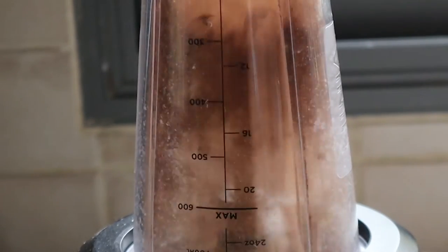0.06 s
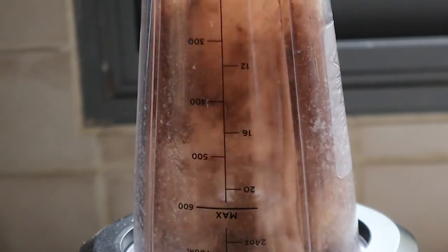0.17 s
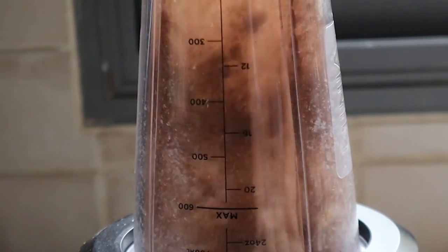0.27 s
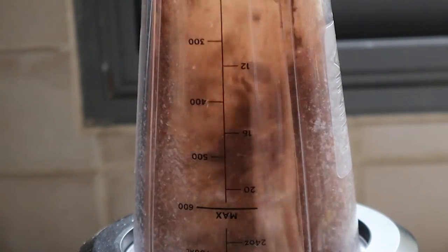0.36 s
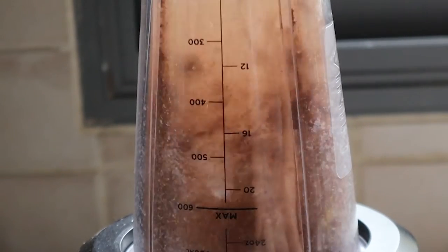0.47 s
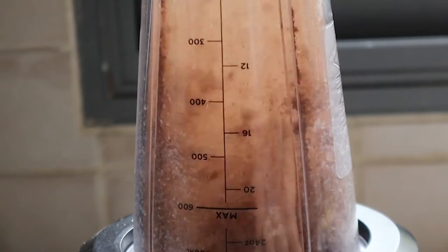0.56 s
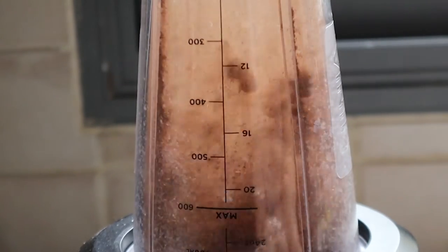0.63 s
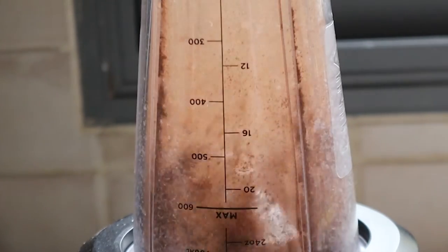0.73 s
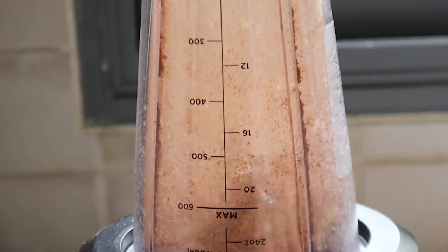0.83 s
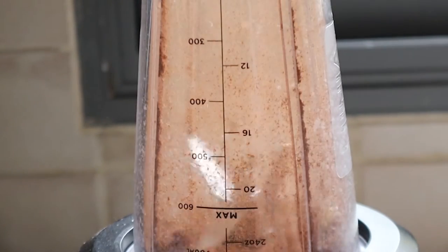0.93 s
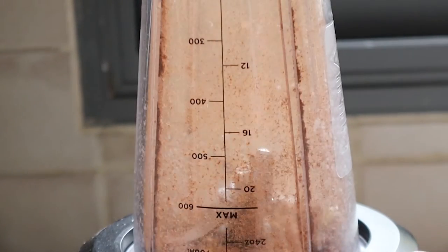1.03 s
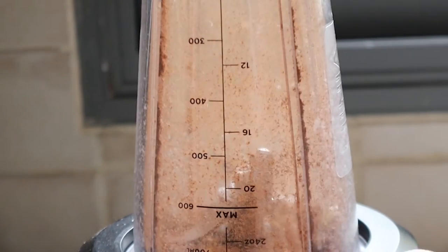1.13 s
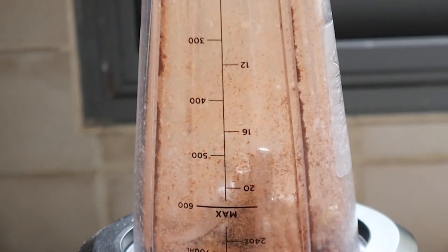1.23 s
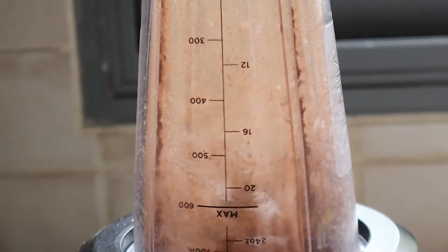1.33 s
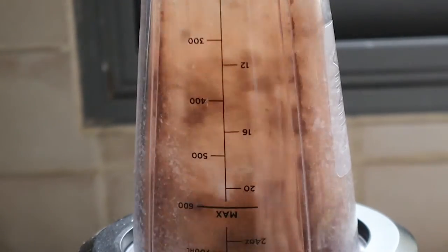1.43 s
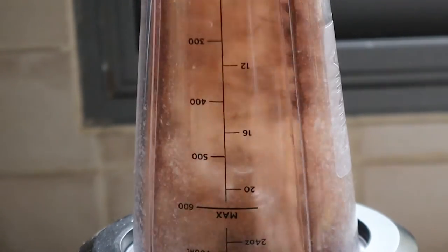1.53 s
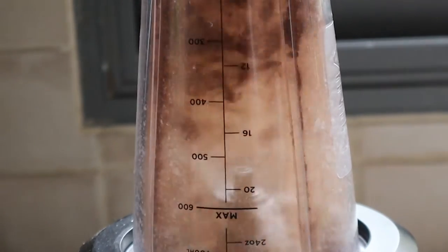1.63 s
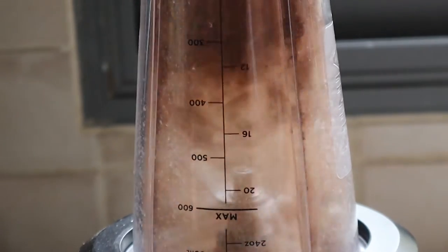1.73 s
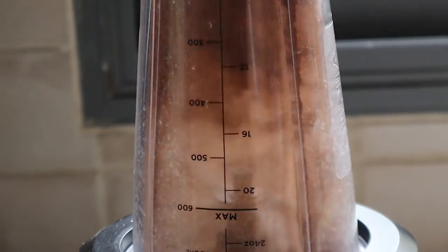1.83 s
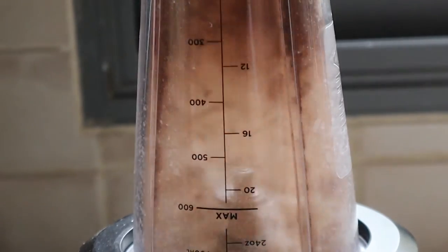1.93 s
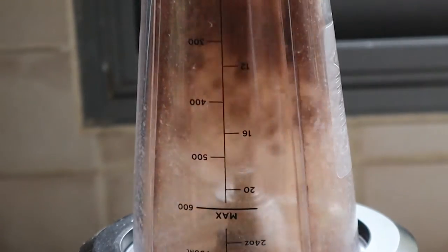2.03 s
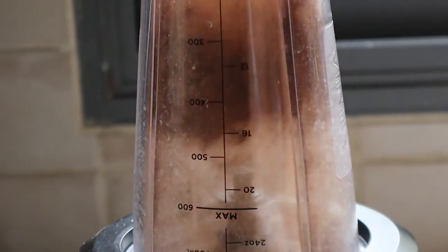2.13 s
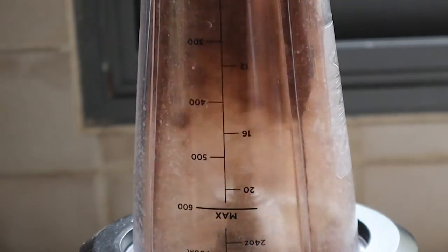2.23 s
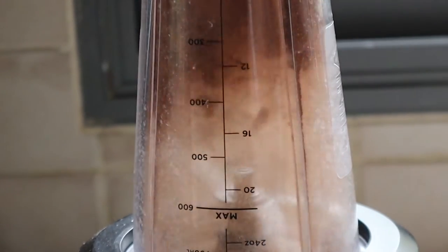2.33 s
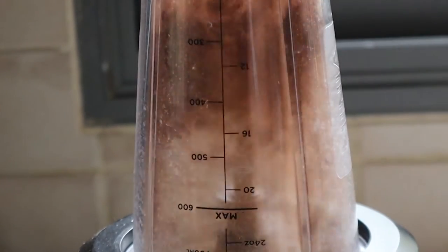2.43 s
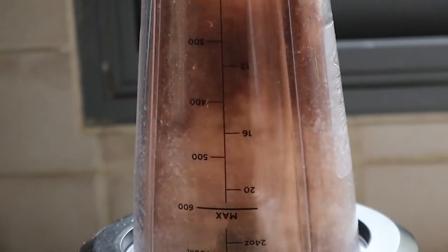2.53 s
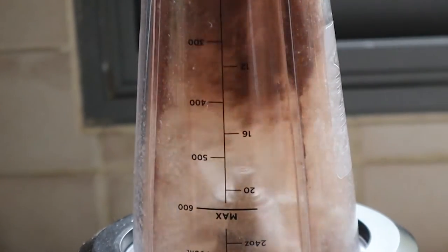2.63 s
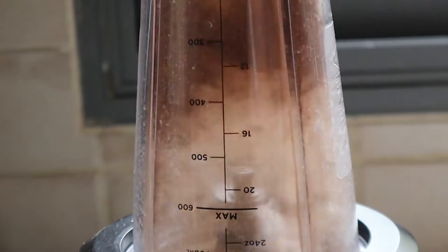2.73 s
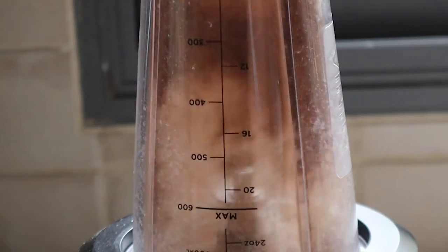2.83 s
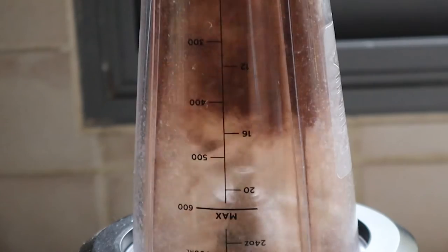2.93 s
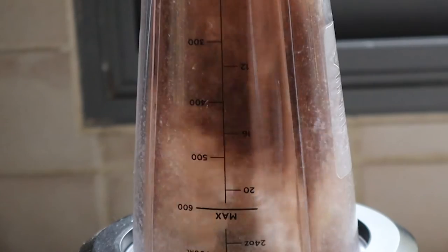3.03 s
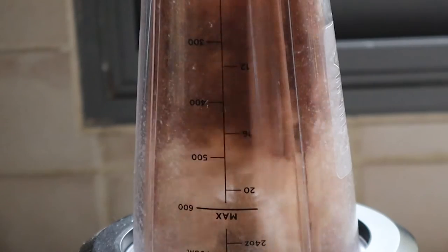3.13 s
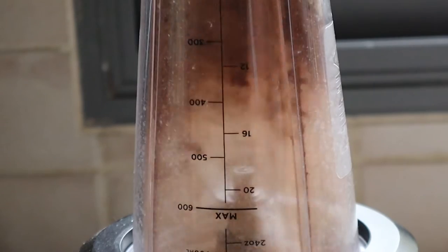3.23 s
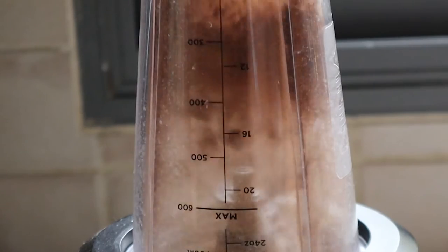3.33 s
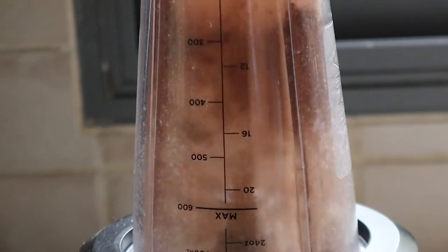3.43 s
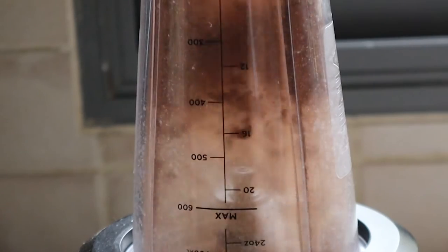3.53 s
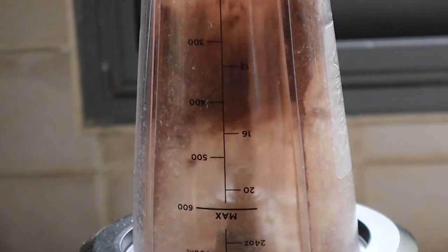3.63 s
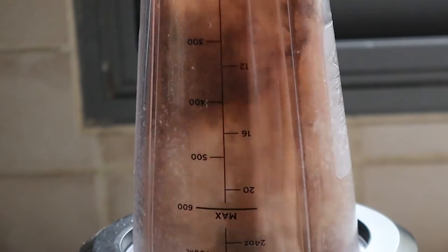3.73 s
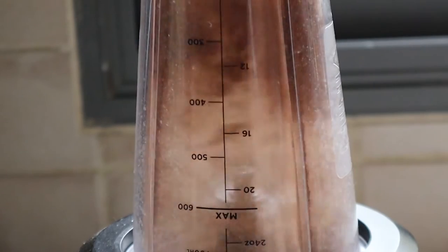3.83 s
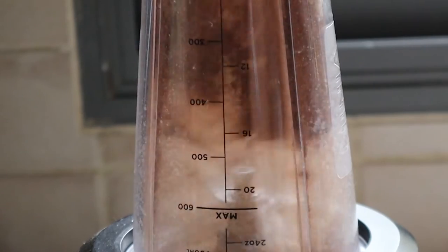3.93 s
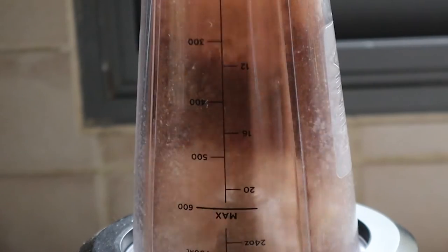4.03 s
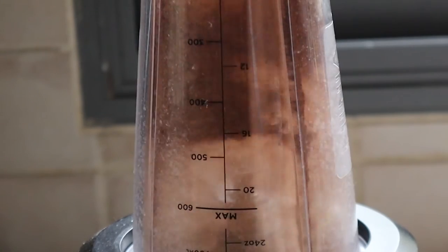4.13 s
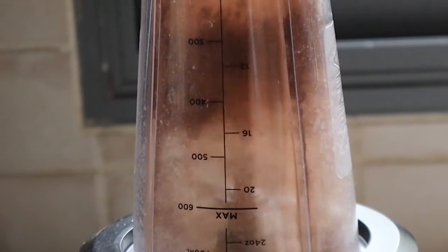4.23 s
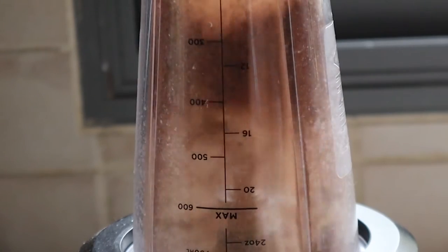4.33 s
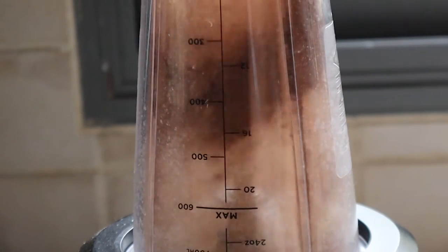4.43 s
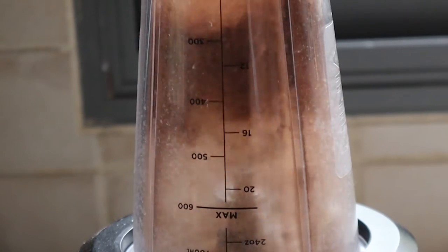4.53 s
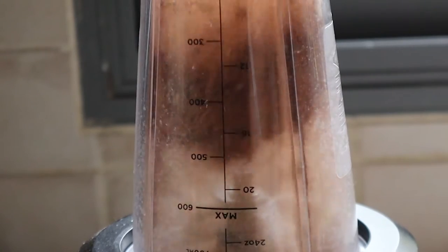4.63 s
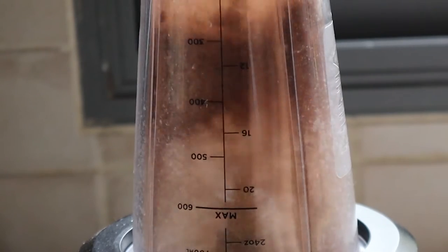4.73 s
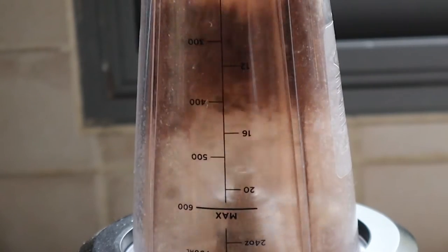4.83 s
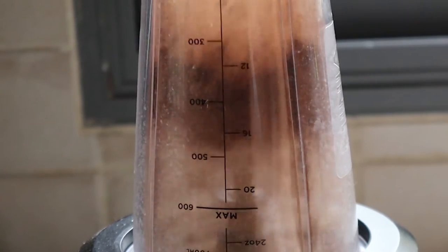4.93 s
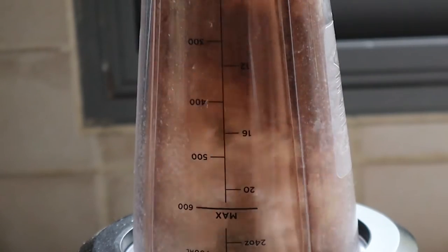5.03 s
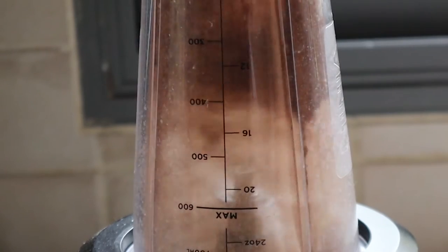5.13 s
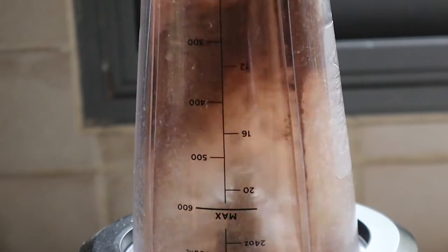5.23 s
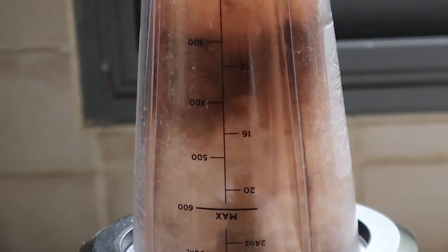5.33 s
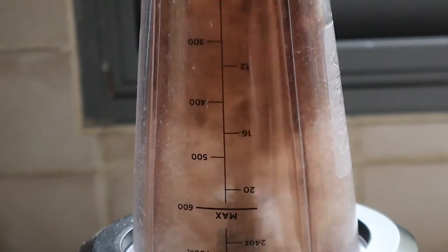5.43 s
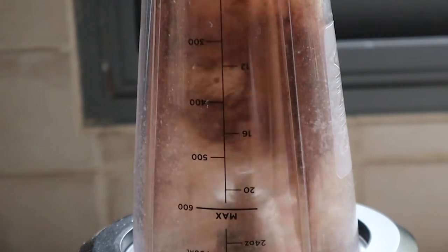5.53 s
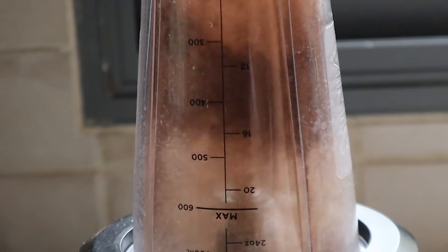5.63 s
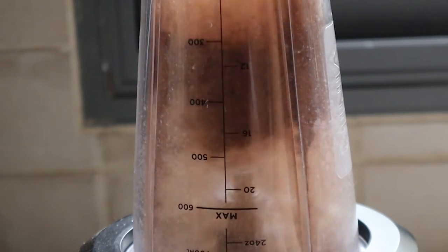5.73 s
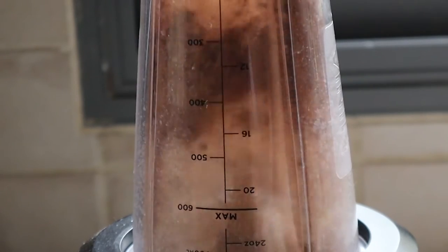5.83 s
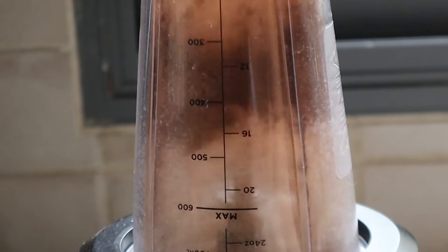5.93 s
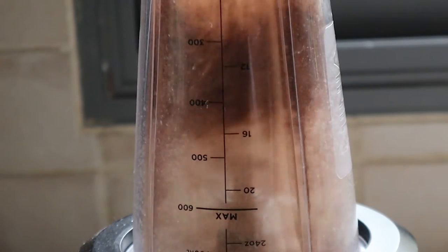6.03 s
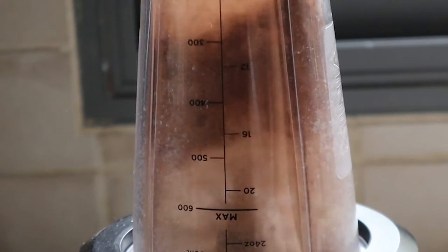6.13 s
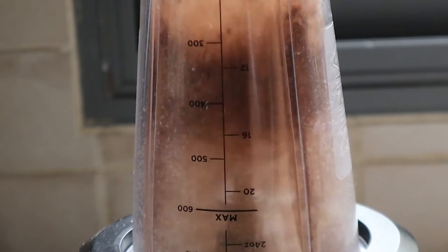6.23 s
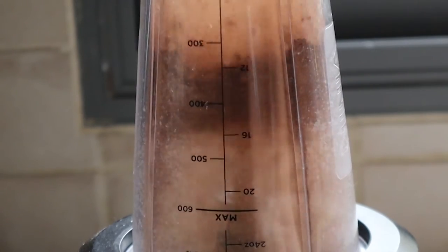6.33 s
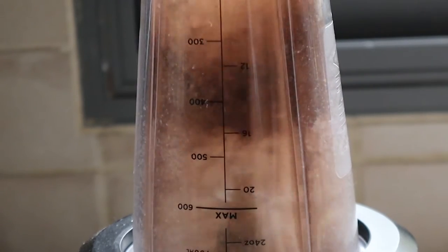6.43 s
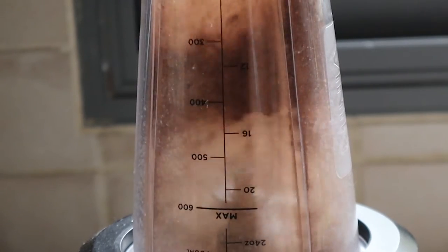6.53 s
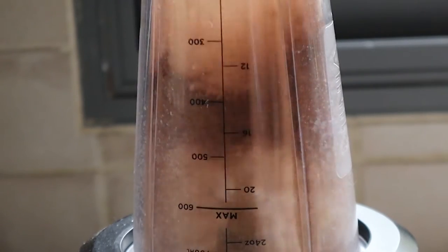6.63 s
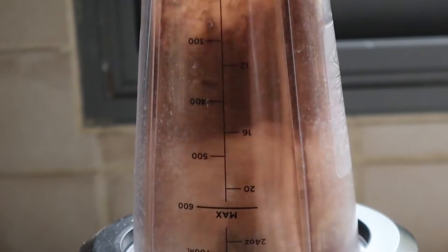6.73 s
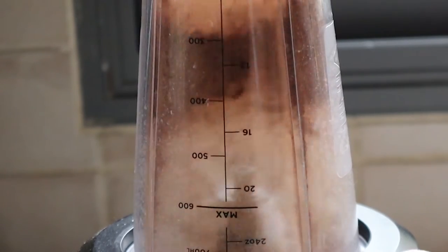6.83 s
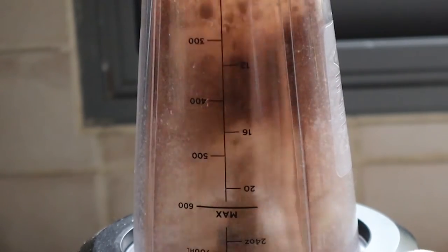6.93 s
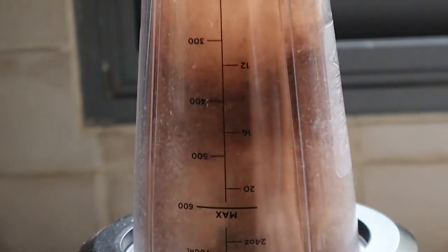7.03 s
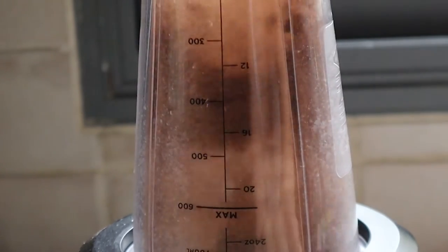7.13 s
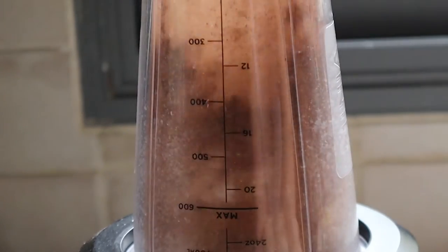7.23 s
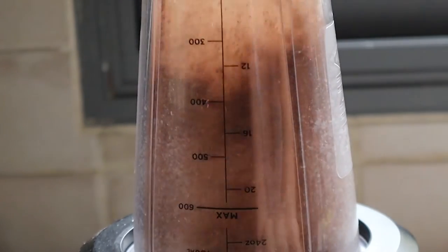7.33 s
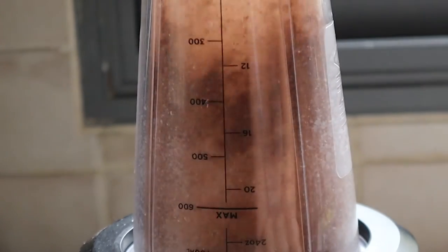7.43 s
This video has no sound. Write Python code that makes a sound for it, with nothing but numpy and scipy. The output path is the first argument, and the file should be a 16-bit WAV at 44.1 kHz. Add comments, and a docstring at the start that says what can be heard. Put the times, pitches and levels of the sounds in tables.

```python
"""Very close, grit rattles in a plastic cup as a small blender coasts to a stop and the hail of grains thins and settles.
The motor starts again: whole seeds knock and crack, fewer as time passes, and fine meal hisses round the wall,
surging as clumps fall into the blade, until the motor is let go. Random impacts drive the wall's colour and the cup's
modes; knocks are short pushes with a bounce; the faint motor hum is a sine at the turning rate.
Behind them lie a short diffuse reverberation and a quiet kitchen of coloured noise and steady tones."""
import sys
import numpy as np
from scipy import signal
from scipy.fft import rfft, irfft
from scipy.io import wavfile

SR = 44100
rng = np.random.default_rng(int(sys.argv[2]) if len(sys.argv) > 2 else 0)


def to_wav(s):
    """Save 16-bit WAV."""
    ch = np.atleast_2d(s).T  # columns
    pcm = np.round(np.clip(ch, -1, 1) * 32767)  # PCM
    wavfile.write(sys.argv[1], SR, pcm.astype(np.int16))


N = 329868
TIME = np.arange(N) / SR  # s


def from_db(db):
    """Decibel definition: a level becomes an amplitude ratio."""
    return 10 ** (np.asarray(db) / 20)


def rms_one(x):
    """Power normalisation: scale to a root mean square of 1."""
    return x / np.sqrt(np.mean(x ** 2) + 1e-20)


def peak_one(x):
    """Peak normalisation: scale to a largest magnitude of 1."""
    return x / np.abs(x).max()


def in_time(rows):
    """Linear interpolation: each column of a time curve, at every sample."""
    s, *columns = np.transpose(rows)
    return [np.interp(TIME, s, column) for column in columns]


def at_hz(points, hz):
    """Logarithmic pitch scale: read a frequency table between its points."""
    points = np.array(points)
    return np.interp(np.log(hz + 1), np.log(points[:, 0]), points[:, 1])


def cut(x, hz, kind, order=2):
    """Butterworth filtering: a maximally flat pass band."""
    sos = signal.butter(order, np.clip(hz, 10, .45 * SR), kind, fs=SR, output="sos")
    return signal.sosfilt(sos, x + 1e-18)


def panned(db):
    """Level-difference stereo: left and right gains that differ by db."""
    return from_db(np.array([[db], [-db]]) / 2)


def drift(rate):
    """Low-pass noise: slow chance with a spread of 1, made by two equal poles at rate (Hz)."""
    step = 40  # samples
    r = np.exp(-2 * np.pi * step * rate / SR)
    noise = rng.standard_normal(N // step + 2002)
    slow = signal.lfilter([1], [1, -2 * r, r * r], noise)[2000:]  # skip the build-up
    return np.interp(np.arange(N) / step, np.arange(len(slow)), rms_one(slow))


def impacts(per_s, spread_db):
    """Poisson-like arrivals: grains land at random, many small ones and a few big."""
    sizes = from_db(spread_db * np.minimum(rng.exponential(1, N), 5))
    return sizes * (rng.random(N) < per_s / SR)


def scatter(clicks):
    """Incoherent excitation: each grain drives each channel with its own sign and strength."""
    return clicks * rng.standard_normal((2, N))


def bursts(rows, fade_s, size=1024):
    """Exponentially decaying noise: a spatter of contacts at each (start_s, peak_db)."""
    drive = np.zeros((2, N + size))
    for s, db in rows:
        start = round(s * SR)
        spatter = rng.standard_normal((2, size)) * np.exp(-TIME[:size] / fade_s)
        drive[:, start:start + size] += from_db(db) * peak_one(spatter)
    return drive[:, :N]


# left-right correlation of the radiated sound: pitch_hz [Hz], correlation [-1 to 1]
CHANNEL_CORRELATION = [(80, 0.41), (280, 0.53), (700, 0.058), (2000, 0.058), (4000, -0.088), (4700, -0.29),
                       (6200, -0.21), (8500, -0.4), (10400, -0.43), (13500, -0.15)]


def radiate(pair, spectrum, size=4096):
    """Minimum-phase filtering: two unrelated drives gain a colour and a left-right correlation."""
    hz = np.arange(size // 2 + 1) * SR / size
    alike = np.clip(at_hz(CHANNEL_CORRELATION, hz), -.95, .95)
    # the correlation sets the balance of mid and side
    gains = from_db(at_hz(spectrum, hz)) * np.sqrt([1 + alike, 1 - alike])
    # folding the cepstrum forward makes the filter causal
    cepstrum = irfft(np.log(gains))
    cepstrum[:, 1:size // 2] *= 2
    cepstrum[:, size // 2 + 1:] = 0
    response = irfft(np.exp(rfft(cepstrum)))
    mid, side = signal.oaconvolve(pair, response, axes=1)[:, :N]
    return np.array([mid + side, mid - side])


# ringing modes of the cup: pitch_hz [Hz], energy_db [relative dB], t60_s [s to fall 60 dB]
CUP_RESONANCES = [(2060, -9.5, 0.022), (2515, -16, 0.041), (2876, -1, 0.052), (3094, 2.5, 0.045),
                  (3218, 0.5, 0.039), (3366, 1.5, 0.064), (3470, -4, 0.058), (3785, -1, 0.025),
                  (3930, -1, 0.064), (4150, -3.5, 0.053), (4360, -1, 0.021), (4884, -2.5, 0.028),
                  (5510, -8, 0.037)]


def cup_ring(drive):
    """Modal superposition: a unit click puts the listed energy into each damped resonance."""
    out = 0
    for k, (hz, db, t60) in enumerate(CUP_RESONANCES):
        r = from_db(-60 / (t60 * SR))
        w = 2 * np.pi * hz / SR
        mode = signal.lfilter([1, 0, -1], [1, -2 * r * np.cos(w), r * r], drive + 1e-18)
        out = out + (-1) ** k * from_db(db) * np.sqrt((1 - r * r) / 2) * mode
    return out


# the motor is switched on and let go: on_s [s], off_s [s]
MOTOR_RUNS = [(-1, 0), (1.375, 7)]
SPIN_UP_S, COAST_S = 0.22, 0.93  # time constant of the rise; length of the straight fall


def blade_speed():
    """Rotor dynamics: exponential spin-up, then constant friction; share of full speed."""
    speed = 0
    for on, off in MOTOR_RUNS:
        rise = 1 - np.exp(-np.maximum(TIME - on, 0) / SPIN_UP_S)
        speed = speed + rise * np.clip(1 - (TIME - off) / COAST_S, 0, 1)
    return speed


# steady hail of grit on the wall: start_s [s], level_db [relative dB]
GRIT_LEVEL = [(0, -19), (.28, -25), (.715, -33.5), (.785, -42.5), (1.12, -73), (1.3, -86.5), (1.38, -78),
              (1.42, -36.5), (1.44, -22), (1.463, -22), (1.488, -17.5), (1.52, -21), (1.545, -16.5),
              (2.12, -21), (3.05, -22.5), (5.0, -23.5), (5.6, -20), (6.4, -21.5), (7.12, -22), (7.31, -26),
              (7.48, -24)]
# low crunch relative to the grit: start_s [s], level_db [relative dB]
CRUNCH_LEVEL = [(0, -22), (.36, -23.5), (.56, -42), (.78, -30), (.9, -10.5), (1.5, -14.5), (3.3, -17),
                (3.73, -18), (3.85, -14), (4.1, -18.5), (4.7, -16.5), (5.05, -20.5), (5.3, -16),
                (7.15, -16.5), (7.36, -22), (7.48, -23)]
# colour of the cup wall under a hard grain: pitch_hz [Hz], level_db [relative dB per Hz]
WALL_COLOUR = [(1200, -27), (1600, -16), (1950, -3), (2350, -6.5), (2750, -2.5), (3150, -5.5), (3550, -2.5),
               (4100, 1), (5200, -3), (8500, -5), (10300, -0.5), (11300, -4), (12600, -11.5), (15000, -25)]


def grit(rise_db, most_per_s=11000, fewest_per_s=2500, full_db=-24, clump_db=0.5,
         crunch_db=-1.0, crunch_follows=0.24, clatter_db=-4.0, clatter_follows=0.069,
         dust_db=-2.0, dust_follows=0.32, unground_db=-4.0, grinding_s=1.3,
         ring_db=-8.0, slide_db=-17, slide_gains=0.3, most_slide_db=-7.0,
         soft_hz=3250, smooth_db=-4.5, flurry_db=0.5, flutter_db=0.83):
    """Shot noise: a hail of fragments, thinning as its level falls; crunch low, clatter mid, dust on top."""
    churn = in_time(GRIT_LEVEL)[0] + rise_db
    slack = np.maximum(full_db - churn, 0)  # dB below the full hail
    # clumps crunch; dust builds up with grinding; weak churning slides instead of striking
    crunch = in_time(CRUNCH_LEVEL)[0] + crunch_db + crunch_follows * rise_db
    unground = unground_db * np.exp(-TIME / grinding_s)
    dust = dust_db + unground - dust_follows * slack + dust_lag()
    clatter = clatter_db - clatter_follows * slack
    slide = np.minimum(slide_db + slide_gains * slack, most_slide_db)

    per_s = fewest_per_s + most_per_s * from_db(-slack)
    clicks = impacts(per_s, spread_db=2.0) / np.sqrt(per_s) * from_db(clump_db * drift(50.4))

    low = cut(radiate(scatter(clicks), WALL_COLOUR), [1500, 2600], "band", order=4)
    low = rms_one(low) * from_db(crunch)

    middle = cut(radiate(scatter(clicks), WALL_COLOUR), 2560, "high", order=12)
    middle = rms_one(cut(middle, 7620, "low", order=4)) * from_db(clatter)

    # the finest dust arrives too thickly to be heard grain by grain
    spray = scatter(rms_one(clicks)) + from_db(smooth_db) * rng.standard_normal((2, N))
    top = rms_one(cut(radiate(spray, WALL_COLOUR), 7450, "high", order=4)) * from_db(dust)

    # the heavier grains that ring the cup arrive in flurries
    flurries = clicks * from_db(flurry_db * drift(30))
    # meal swirling along the wall loads it and keeps its modes moving
    ring = wander(cup_ring(scatter(flurries)), share=.012, rate=12)
    ring = rms_one(cut(ring, 2200, "high")) * from_db(ring_db)

    # sliding meal touches softly and wakes only the lowest modes
    meal = cut(cup_ring(scatter(flurries)), soft_hz, "low", order=6)
    meal = rms_one(meal) * from_db(slide)

    hail = hollowed(low + middle + ring + meal) * panned(0.42) + top * panned(1.0)
    return from_db(churn + flutter_db * drift(24)) * hail


def dust_lag(late_db=-14, lift_s=0.061):
    """Exponential relaxation: the dust dips (dB) around the restart, then rises and brightens the roar."""
    since = TIME - MOTOR_RUNS[1][0]
    return late_db * np.exp(-np.abs(since) / lift_s)


def wander(x, share, rate):
    """Doppler-like time warping: all pitches wander together by a small share."""
    at = (np.arange(N) + np.cumsum(share * drift(rate))) % N
    return np.array([np.interp(at, np.arange(N), side) for side in x])


# hollows round the cup's lowest mode: pitch_hz [Hz], width_hz [Hz], depth [0 to 1]
WALL_HOLLOWS = [(1600, 330, 0.1), (2150, 130, 0.4), (2550, 230, 0.12)]


def hollowed(x):
    """Band rejection: gaps between the low modes open as the blade slows, fully by 99 % of full speed."""
    opening = np.clip((1 - blade_speed()) / .01, 0, 1)
    for hz, width_hz, depth in WALL_HOLLOWS:
        band = signal.lfilter(*signal.iirpeak(hz, hz / width_hz, fs=SR), x)
        x = x - depth * opening * band
    return x


# clumps of seeds falling into the blade:
# middle_s [s], length_s [s], grit_rise_db [dB], pieces_level_db [relative dB]
CLUMP_SURGES = [(0.282, 0.018, 3, -65.0), (0.381, 0.067, 2, -69.0), (1.597, 0.16, 3.5, -42.5),
                (1.657, 0.02, 0.5, -54), (1.714, 0.053, 3.5, -36.5), (1.788, 0.072, 3.5, -35),
                (1.904, 0.14, 1.7, -42), (1.992, 0.17, 4, -39), (2.264, 0.12, 4.5, -39.0),
                (2.35, 0.043, 3.8, -45), (2.423, 0.075, 3.3, -43), (2.59, 0.13, 3, -38.5),
                (2.644, 0.19, 2.5, -44.0), (2.798, 0.032, 3, -39), (2.886, 0.077, 5.5, -40.5),
                (2.974, 0.045, 3.3, -46), (3.066, 0.039, 2, -59), (3.106, 0.022, 2.4, -55.0),
                (3.155, 0.064, 3.5, -50), (3.275, 0.141, 5.5, -45.5), (3.407, 0.087, 3, -45),
                (3.529, 0.028, 3.5, -45.5), (3.596, 0.14, 4.5, -51), (3.853, 0.13, 4.5, -47.5),
                (4, 0.056, 5, -45.5), (4.063, 0.025, 3, -51.0), (4.23, 0.23, 3, -54),
                (4.412, 0.027, 4.5, -51), (4.454, 0.028, 4, -60.0), (4.528, 0.08, 3.4, -50),
                (4.714, 0.21, 6, -43), (4.868, 0.066, 4, -50), (4.94, 0.022, 3.5, -60.0),
                (5.092, 0.085, 5, -49.5), (5.188, 0.023, 2, -52), (5.28, 0.13, 4, -49),
                (5.424, 0.051, 3.5, -48), (5.5, 0.072, 3, -49), (5.58, 0.044, 1, -55),
                (5.671, 0.042, 3, -51), (5.745, 0.036, 2.5, -62.0), (5.93, 0.21, 2, -52.0),
                (6.037, 0.039, 0.7, -58), (6.113, 0.061, 1.5, -64), (6.208, 0.036, 3.5, -52),
                (6.305, 0.029, 2, -52), (6.356, 0.02, 3, -49), (6.501, 0.049, 2.5, -57),
                (6.605, 0.048, 3.2, -46.5), (6.726, 0.118, 3, -54), (6.84, 0.077, 3, -51.0),
                (6.959, 0.13, 2.5, -46.5), (7.102, 0.024, 3.5, -56.0), (7.237, 0.022, 1.4, -62.0)]


def clumps(coarse_share=0.8, pieces_db=-1.0):
    """Gaussian envelopes: grit rise (dB) and power of the coarse pieces, whose bell is narrower."""
    t = TIME[::32]  # slow curves need few points
    rise_db, coarse = 0, 0
    for s, length, db, coarse_db in CLUMP_SURGES:
        away = (2 * (t - s) / length) ** 2
        rise_db = rise_db + db * .5 ** away
        pieces = from_db(coarse_db + pieces_db) * .5 ** (away / coarse_share ** 2)
        coarse = coarse + pieces ** 2
    return np.interp(TIME, t, rise_db), np.interp(TIME, t, coarse)


# whole seeds flung by the blade:
# peak_s [s], peak_db [dB], pitch_hz [Hz], left_right_db [dB], shell_snap_db [dB against the push]
SEED_KNOCKS = [(0.085, -33, 280, 3, -10), (1.549, -24, 373, -5, 5), (1.703, -24, 290, -1, -4),
               (1.718, -29, 730, -18, 0), (1.739, -19, 310, -4, 7), (1.773, -18, 318, 1, 3),
               (1.797, -23, 238, 3, 1), (1.801, -16, 690, -6, 8), (1.81, -25, 220, -2, -7),
               (1.869, -15.5, 212, 1, 0), (1.9, -18.5, 555, -2, 0), (1.9528, -24, 305, 6, -2),
               (1.968, -18, 374, -1, -8), (1.9819, -5.5, 784, 4, 2), (2.041, -30, 690, -5, 7),
               (2.074, -38, 960, -3, -4), (2.226, -19, 880, 2, -3), (2.242, -22, 210, 1.5, -8),
               (2.274, -31, 300, -10, -5), (2.348, -29, 420, 0, -7), (2.37, -25, 560, -2, 3),
               (2.419, -32, 500, -8, 0), (2.444, -33, 950, -11, -15), (2.572, -15.5, 387, 3, -8),
               (2.5844, -19, 520, -5, -5), (2.611, -14, 430, 0, 0), (2.617, -23, 260, 4, -2),
               (2.654, -27, 270, -4, -4), (2.792, -21, 112, 9, 1), (2.884, -22, 260, -1, -1),
               (2.897, -27, 280, 0, -1), (3.112, -30, 295, -1, -14), (3.1438, -35, 330, 0, -2),
               (3.165, -29, 257, -3, -12), (3.236, -21.5, 306, -4, 1), (3.376, -19, 313, 0, 0),
               (3.3835, -22, 850, -3, 6), (3.392, -14, 544, 9, -19), (3.4207, -34, 600, -4, -6),
               (3.442, -25.5, 262, 2, -5), (3.527, -29.5, 278, 6, -12), (3.5748, -28, 520, -4, -4),
               (3.626, -23, 128, 5, 1), (3.6715, -34, 450, 0, -5), (3.8365, -34, 600, 0, -2),
               (3.8504, -35, 950, 3, -2), (3.985, -29, 380, -4, -15), (3.997, -23, 392, -11.5, -13),
               (4.038, -30.5, 298, -4, -12), (4.666, -20, 480, -2, 2), (4.676, -19, 334, -1, 1),
               (4.686, -26, 420, 6, -6), (4.694, -17, 450, 2, -8), (4.698, -25, 503, 13, -16),
               (4.83, -30, 750, 0, -5), (5.137, -31, 1000, 5, -7), (5.241, -36, 377, -2, -10),
               (5.431, -29.5, 440, -7, 1), (5.5218, -31, 540, -6, -8), (5.538, -36, 655, -3, -4),
               (5.8618, -33, 1250, -9, 3), (5.961, -27, 112, 7, 0.5), (6.095, -35, 795, 0, -7),
               (6.319, -36, 850, 0, -5), (6.526, -35, 950, 6, -3), (6.595, -26, 115, 2, 1),
               (6.874, -29, 275, 1, -11), (6.93, -17.5, 384, 3.5, -12)]
# a knock rocks the cup, so one side lags by a share of a cycle; below ROCK_HZ it moves more as a whole
ROCK_LAG_CYCLES, ROCK_HZ = 0.38, 252


def knocks(upper=1.92, lower=0.34, snap_hz=740, bounce_db=-14, cycles=3.9,
           thump_db=-13, thump_hz=100, size=4096):
    """Impulse response: a seed gives the wall a push and swing back, a bounce, a snap and a base thump."""
    out = np.zeros((2, N + 2 * size))
    click, t = signal.unit_impulse(size), TIME[:size]
    snap = peak_one(cut(click, [snap_hz / 1.5, snap_hz * 1.9], "band", order=3))
    thump = peak_one(cut(click, [thump_hz / 2.8, thump_hz * 1.42], "band"))
    for s, db, hz, pan_db, snap_db in SEED_KNOCKS:
        lag_s = ROCK_LAG_CYCLES / hz * min(hz / ROCK_HZ, 1) ** 3
        push = peak_one(cut(cut(click, hz * upper, "low", order=4), hz * lower, "high"))
        # the bounce falls 60 dB within the given cycles
        bounce = np.sin(2 * np.pi * hz * t) * np.exp(-np.log(1000) * hz * t / cycles)
        blow = push + from_db(bounce_db) * bounce + from_db(snap_db) * snap + from_db(thump_db) * thump
        for channel, side in enumerate((1, -1)):
            # the blow's peak falls at the listed time, shifted by half the lag
            start = max(round((s + side * lag_s / 2) * SR) - np.argmax(blow), 0)
            out[channel, start:start + size] += from_db(db + side * pan_db / 2) * peak_one(blow)
    return out[:, :N]


# seeds cracking and single ticks on the wall: start_s [s], peak_db [relative dB], cup_ring_db [dB against the crack]
SEED_CRACKS = [(0.064, -5, -15), (.21, -17.5, -15), (.383, -5, -10), (0.428, -13, -12), (0.617, -24, -16),
               (.667, -26, -8), (.716, -26, -12), (0.742, -30, -15), (0.879, -37, 9.5), (.9368, -41, 2),
               (.975, -46, -8), (1.04, -55, -13), (1.1674, -62, -9), (1.3304, -48, -12), (1.339, -54, -12),
               (1.412, -15, -7), (1.4396, -22, -8), (1.5392, -3, -16), (1.5684, 0, -16), (1.574, -3, -13),
               (1.595, 10, -13), (1.799, 7, -17), (1.807, 10, -19), (1.983, 1, -15), (2.2255, -1, -15),
               (2.349, -5, -9), (2.781, -6, -15), (2.862, -5, -14), (2.897, -10, -13), (2.965, -6, -17),
               (3.1047, -13, -8.5), (3.274, 1, -6), (3.987, 1, -10), (4.03, -3, -16), (4.627, -4, -10),
               (5.49, -1, -2), (6.1995, -1, -4), (6.279, -5, -8), (7.165, -5, -9), (7.237, -6, -6)]


def cracks(level_db=-9.0):
    """Brittle fracture: a burst of tiny breaks excites the wall and the cup's strongest modes."""
    snap = bursts([(s, db) for s, db, ring_db in SEED_CRACKS], fade_s=0.00099)
    push = bursts([(s, db + ring_db) for s, db, ring_db in SEED_CRACKS], fade_s=0.0016)
    ring = cut(cup_ring(push), [2800, 3350], "band")
    return from_db(level_db) * (radiate(snap, WALL_COLOUR) + ring)


# coarse pieces tumbling between the clumps: start_s [s], level_db [relative dB]
TUMBLE_LEVEL = [(0, -52), (.3, -59), (.75, -69.5), (.95, -76), (1.12, -93), (1.38, -89.5), (1.425, -51),
                (1.65, -50), (1.95, -47), (2.15, -52), (5.0, -54.5), (5.35, -53), (7.0, -51.5),
                (7.3, -59.5), (7.48, -58.5)]
# colour of the cup under a heavy piece: pitch_hz [Hz], level_db [relative dB per Hz]
BODY_COLOUR = [(50, -16), (130, -10.5), (200, -5), (290, 3), (420, 2.5), (520, 0.5), (650, 1.5), (900, 5),
               (1300, 2), (1700, 7.5), (2600, -18), (5000, -55)]
# colour of the base's rumble: pitch_hz [Hz], level_db [relative dB per Hz]
BASE_COLOUR = [(20, -19.5), (45, -8), (80, -1.5), (150, -4), (260, -10.5), (600, -45), (1500, -66)]


def tumble(coarse, level_db=3.5, lumpy_db=0.45, heavy_db=-39, shake_db=-47, shake_follows=1.23,
           speed_power=2):
    """Forced vibration: pieces drum on the cup; the base shakes with the square of speed and with load."""
    level = 10 * np.log10(from_db(in_time(TUMBLE_LEVEL)[0]) ** 2 + coarse)  # powers add
    clicks = impacts(1900, spread_db=0.0) * from_db(lumpy_db * drift(40))
    drum = from_db(level + level_db) * rms_one(radiate(scatter(clicks), BODY_COLOUR))
    shake = blade_speed() ** speed_power * from_db(shake_db + shake_follows * (level - heavy_db))
    rumble = rms_one(radiate(scatter(clicks), BASE_COLOUR))
    return drum + shake * rumble * panned(1.6)


# the cup shifting in its seat as the motor stops and starts, or a big seed jolts it:
# start_s [s], peak_db [relative dB]
SEAT_CLUNKS = [(.7995, -41), (.934, -49), (1.384, -52), (1.394, -42), (1.414, -34), (1.443, -30),
               (3.393, -16), (3.998, -32), (6.931, -30)]


def clunks(level_db=-12, seed_db=-8, hard_hz=620, softness=0.55):
    """Impact excitation: the cup rocks in its seat at the listed shifts and under every seed knock."""
    blows = np.zeros((2, N))
    for s, db, hz, pan_db, snap_db in SEED_KNOCKS:
        # a soft, low blow wakes the seat less; rocking pushes one side and pulls the other
        hardness = min(hz / hard_hz, 1) ** softness
        blows[:, round(s * SR)] = from_db(db + seed_db) * hardness * np.array([1, -.4])
    return seat_ring(from_db(level_db) * bursts(SEAT_CLUNKS, fade_s=0.0028) + blows)


# ringing modes of the seat: pitch_hz [Hz], level_db [relative dB], t60_s [s to fall 60 dB]
SEAT_RESONANCES = [(299, -2, 0.042), (480, -4, 0.04), (660, 1, 0.042), (820, 5, 0.045), (985, -3, 0.035)]


def seat_ring(drive):
    """Damped modal response: the cup rings dully against its seat."""
    t = TIME[:4096]
    ring = 0
    for hz, db, t60 in SEAT_RESONANCES:
        ring = ring + from_db(db - 60 * t / t60) * np.sin(2 * np.pi * hz * t)
    rung = signal.oaconvolve(drive, peak_one(ring)[None], axes=1)[:, :N]
    return cut(rung, [230, 1100], "band")


# turning rate under power, wandering between 220 and 247 turns per s,
# before the blade's speed share and a slight waver: start_s [s], rate_hz [turns per s]
TURN_RATE = [(2.9, 220), (3.15, 247), (3.75, 230), (4.5, 240), (5.05, 240), (5.5, 235), (6.05, 235),
             (6.5, 235), (6.9, 247)]


def motor(level_db=-61.0, waver_db=1.5, speed_power=12.0):
    """Rotating imbalance: the rotor hums once per turn, and only near full speed."""
    speed = blade_speed()
    turns_per_s = speed * in_time(TURN_RATE)[0] * (1 + 0.0014 * drift(8.7))
    phase = 2 * np.pi * np.cumsum(turns_per_s) / SR
    level = speed ** speed_power * from_db(level_db + waver_db * drift(6.3))
    return np.sqrt(2) * level * np.sin(phase + np.array([[0], [.9]]))  # right leads by .9 rad


def kitchen(x, wet_db=-13, t60=0.086, size=16384):
    """Diffuse reverberation: a short answer from the tiled walls as exponentially decaying noise."""
    t = TIME[:size]
    tail = rng.standard_normal((2, size)) * from_db(-60 * t / t60) * (t > .004)
    tail = cut(cut(tail, 7400, "low", order=1), 360, "high")
    return from_db(wet_db) * signal.oaconvolve(x, rms_one(tail) / np.sqrt(size), axes=1)[:, :N]


# colour of the quiet kitchen: pitch_hz [Hz], level_db [relative dB per Hz]
ROOM_COLOUR = [(30, -10), (100, -13.5), (180, -1), (280, -2), (420, -8), (650, -10), (1100, -20.5),
               (3000, -19.5), (6000, -23.5), (14000, -45.5)]
# steady tones of the kitchen: pitch_hz [Hz], level_db [rms dB]
STEADY_TONES = [(167, -92.5), (393, -88), (538, -96.5), (670, -97.5), (786, -99.5)]


def room_floor(level_db=-84):
    """Stationary background: coloured noise for still air, with faint steady sine tones."""
    tones = 0
    for hz, db in STEADY_TONES:
        tones = tones + np.sqrt(2) * from_db(db) * np.sin(2 * np.pi * hz * TIME)
    air = rms_one(radiate(rng.standard_normal((2, N)), ROOM_COLOUR))
    return from_db(level_db) * air + tones


def scene():
    """Linear superposition: the cup and all that strikes it, the motor under it, the kitchen around."""
    rise_db, coarse = clumps()
    blender = grit(rise_db) + tumble(coarse) + knocks() + cracks() + clunks()
    return blender + kitchen(blender) + motor() + room_floor()


def record(dry, cutoff_hz=15500):
    """Soft saturation and band limiting: the tallest peaks are rounded and the top is cut steeply."""
    rounded = dry / (1 + (dry / .8) ** 4) ** .25
    return signal.sosfilt(signal.ellip(12, .1, 100, cutoff_hz, fs=SR, output="sos"), rounded)


dry = scene()
out = record(dry)
to_wav(out)
```